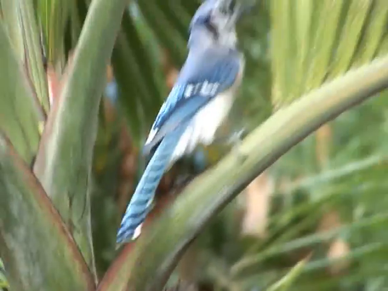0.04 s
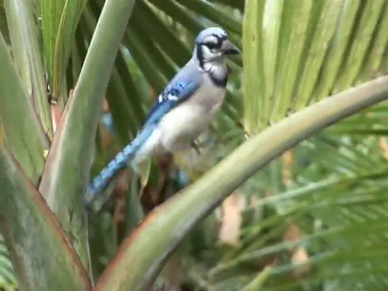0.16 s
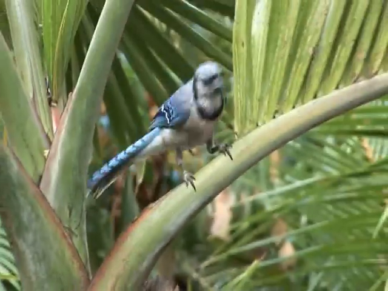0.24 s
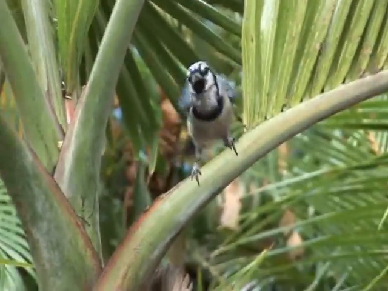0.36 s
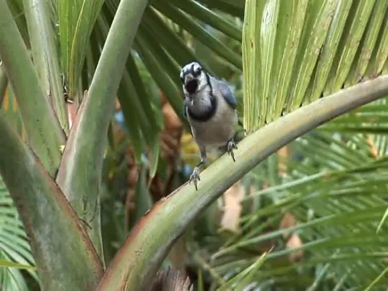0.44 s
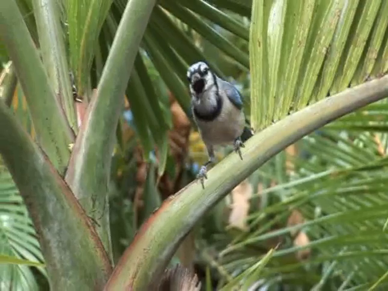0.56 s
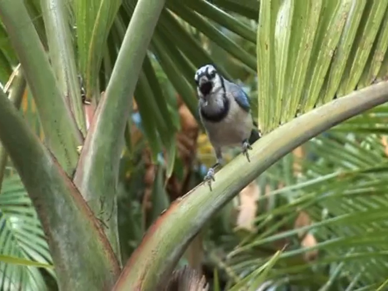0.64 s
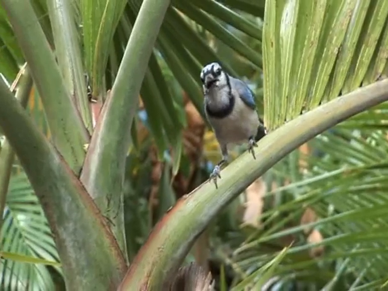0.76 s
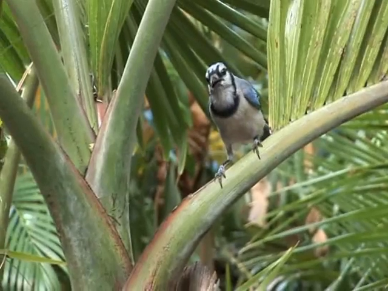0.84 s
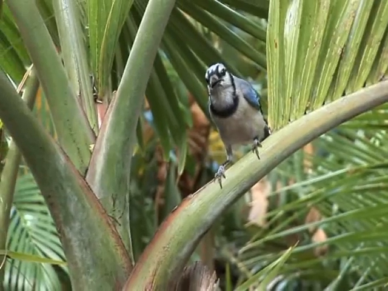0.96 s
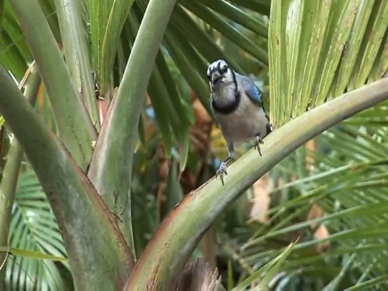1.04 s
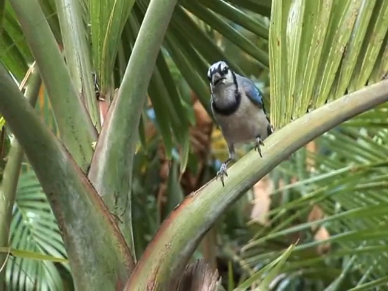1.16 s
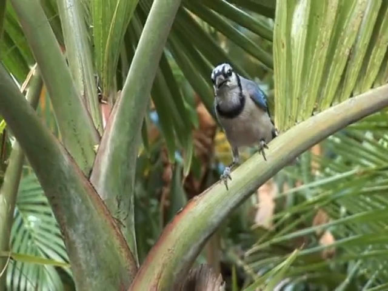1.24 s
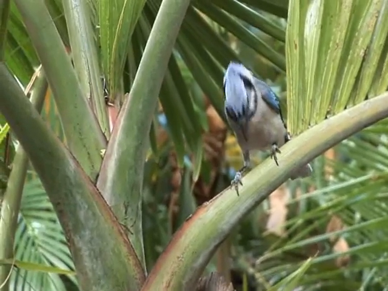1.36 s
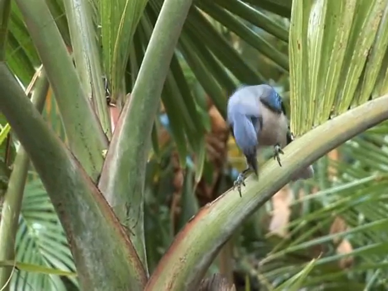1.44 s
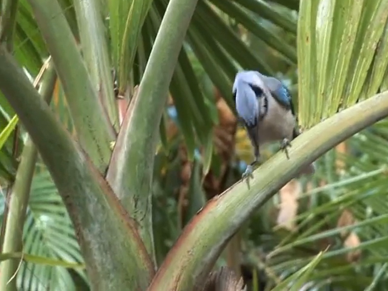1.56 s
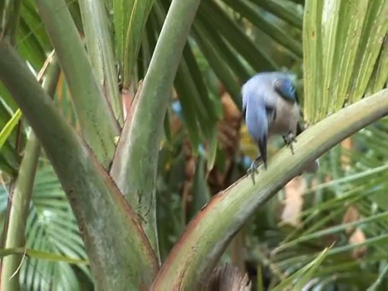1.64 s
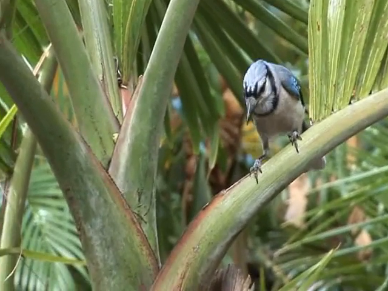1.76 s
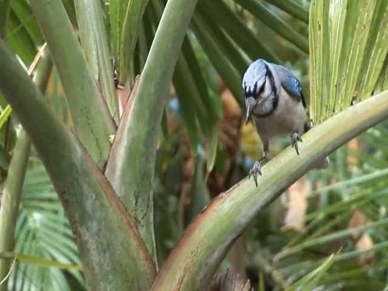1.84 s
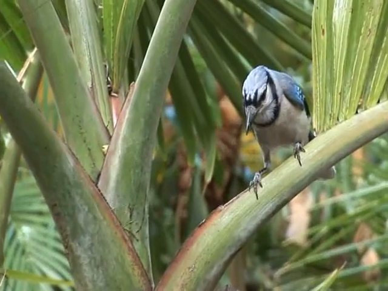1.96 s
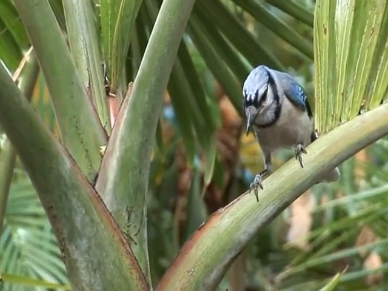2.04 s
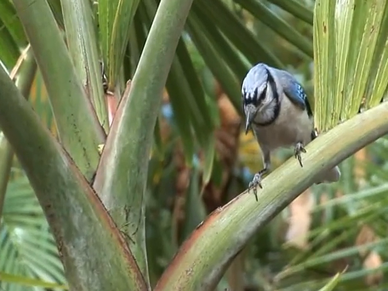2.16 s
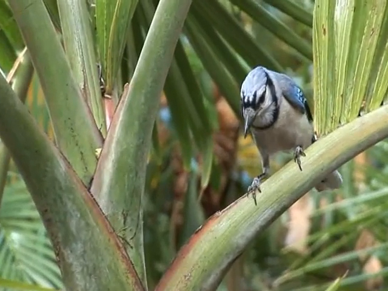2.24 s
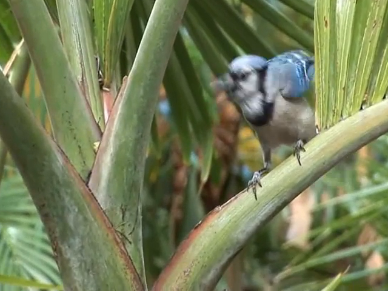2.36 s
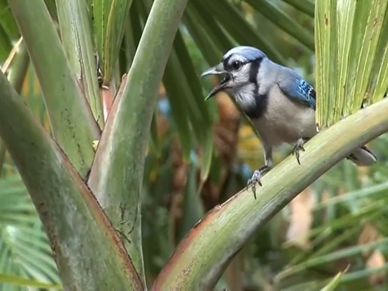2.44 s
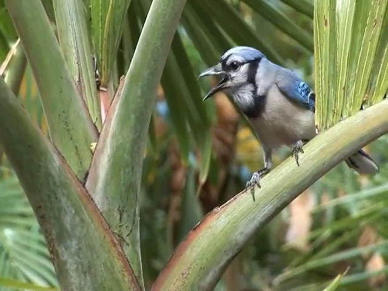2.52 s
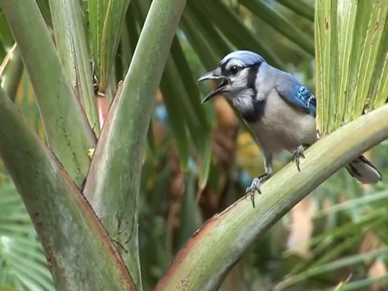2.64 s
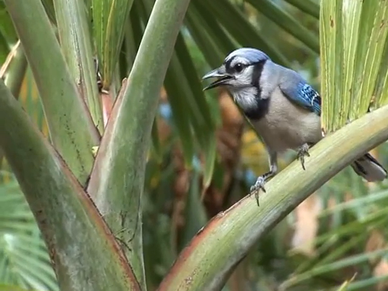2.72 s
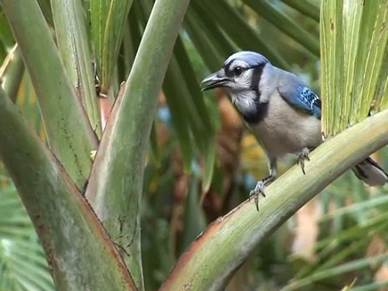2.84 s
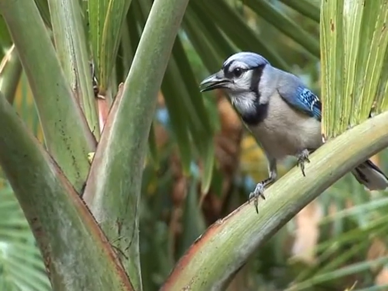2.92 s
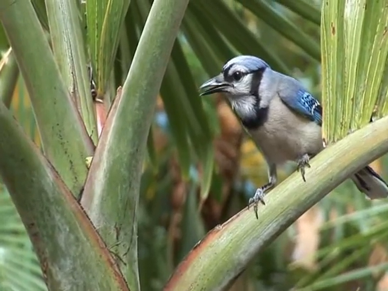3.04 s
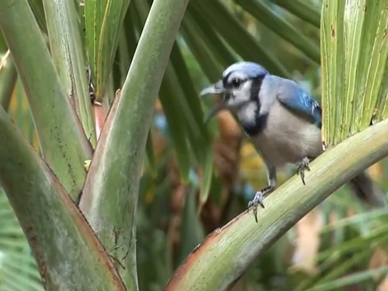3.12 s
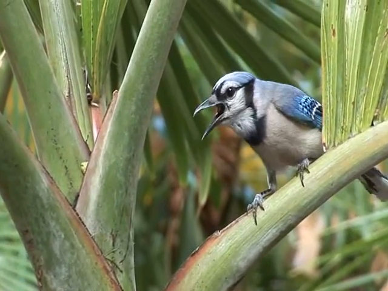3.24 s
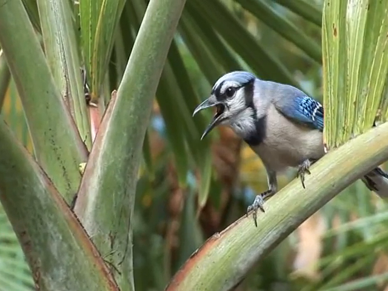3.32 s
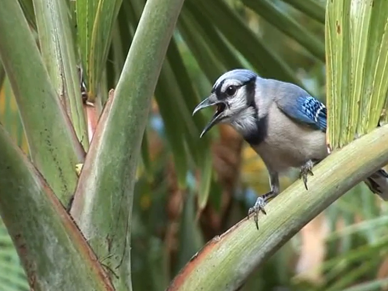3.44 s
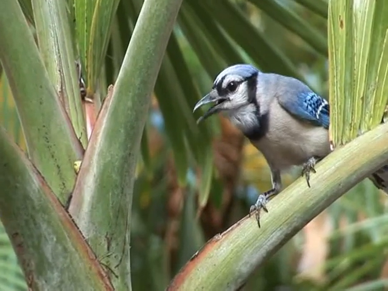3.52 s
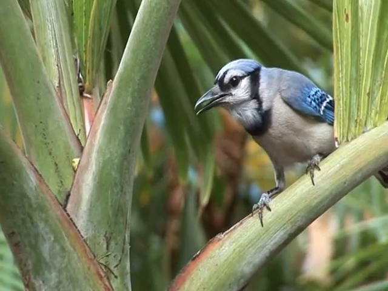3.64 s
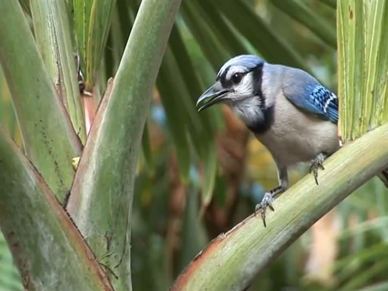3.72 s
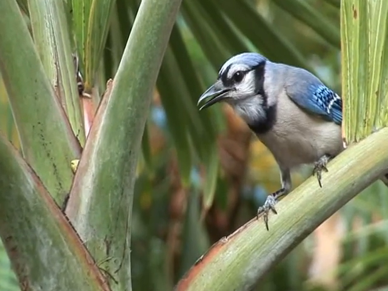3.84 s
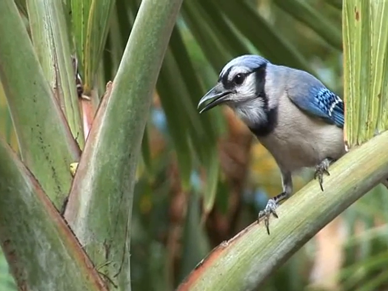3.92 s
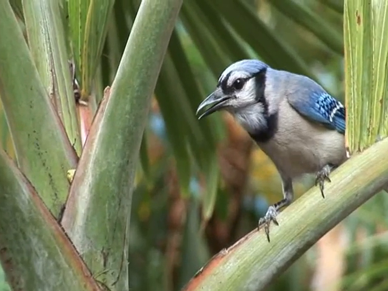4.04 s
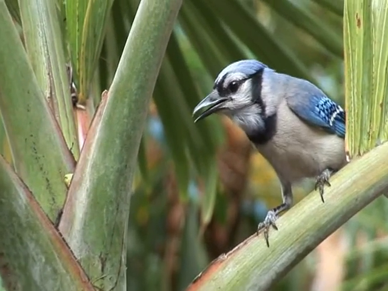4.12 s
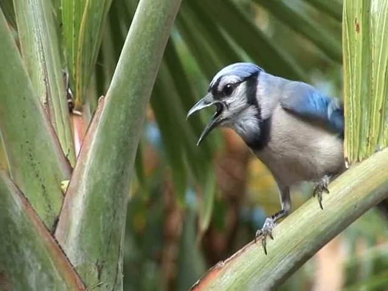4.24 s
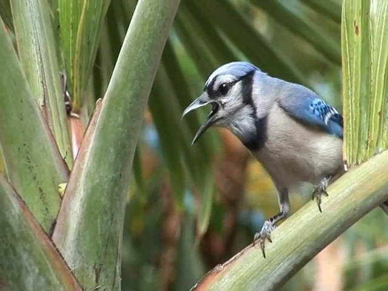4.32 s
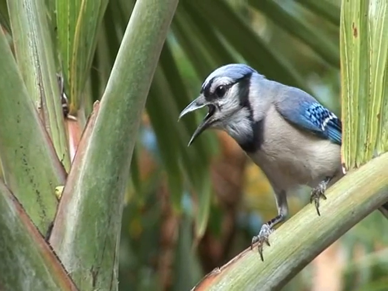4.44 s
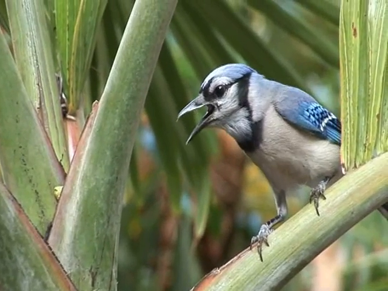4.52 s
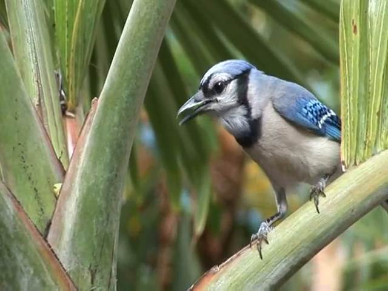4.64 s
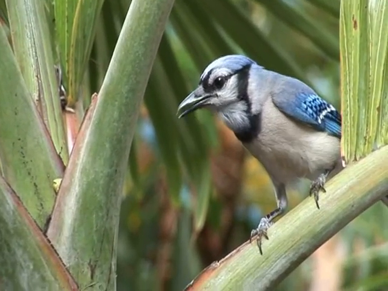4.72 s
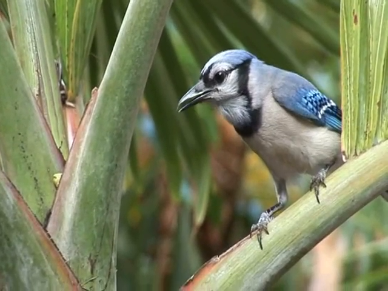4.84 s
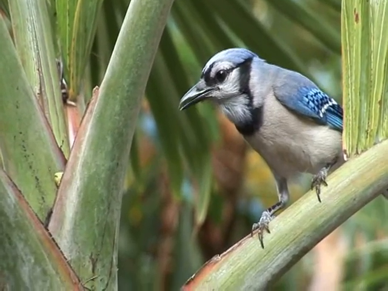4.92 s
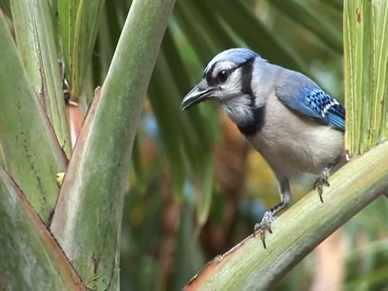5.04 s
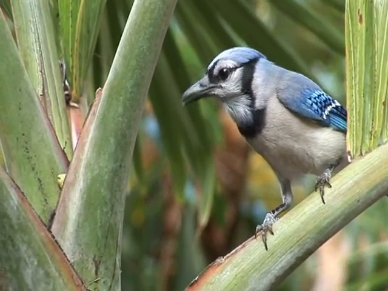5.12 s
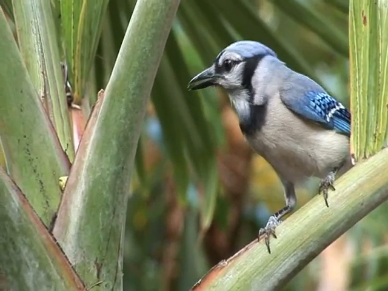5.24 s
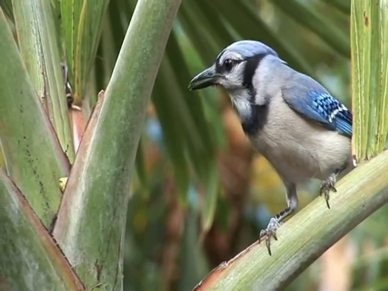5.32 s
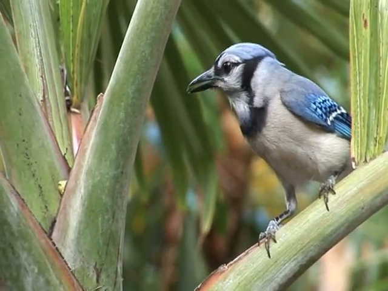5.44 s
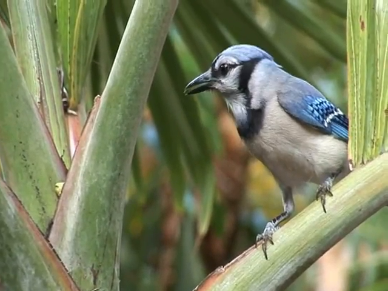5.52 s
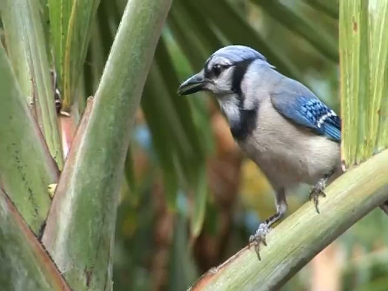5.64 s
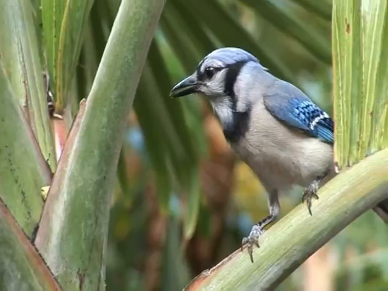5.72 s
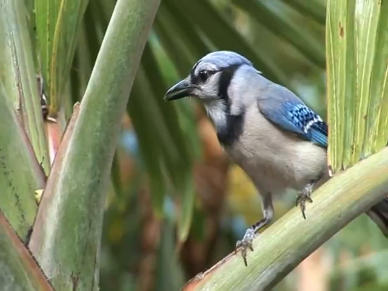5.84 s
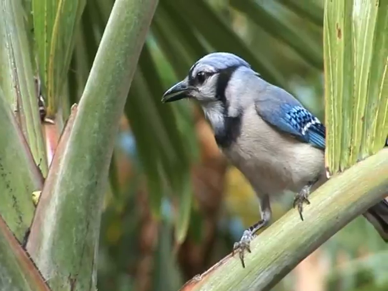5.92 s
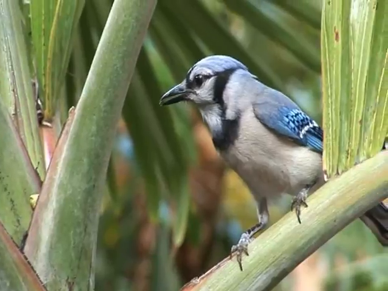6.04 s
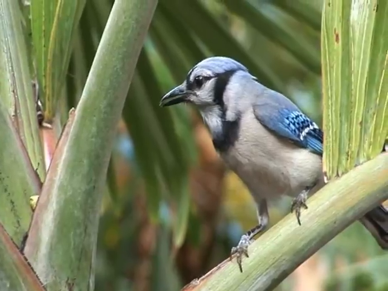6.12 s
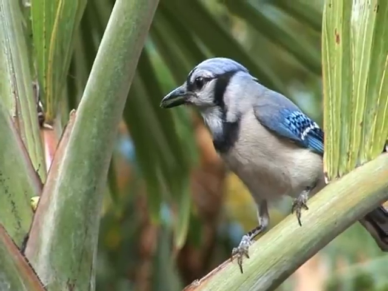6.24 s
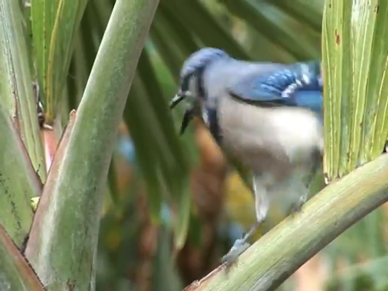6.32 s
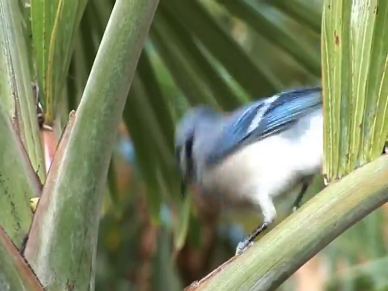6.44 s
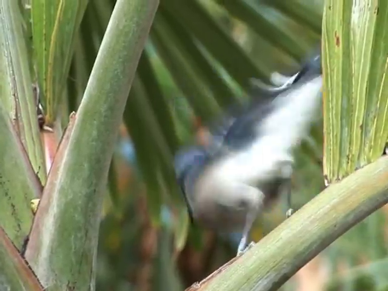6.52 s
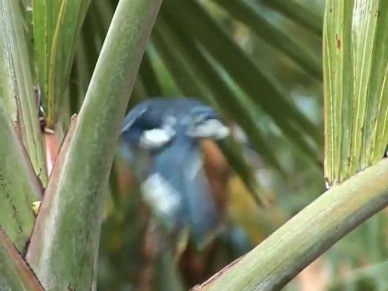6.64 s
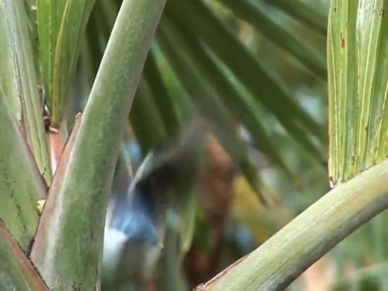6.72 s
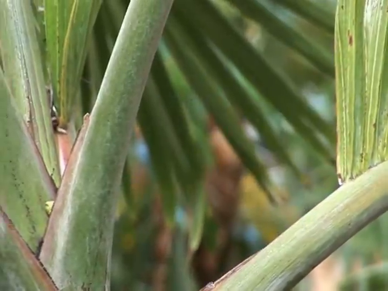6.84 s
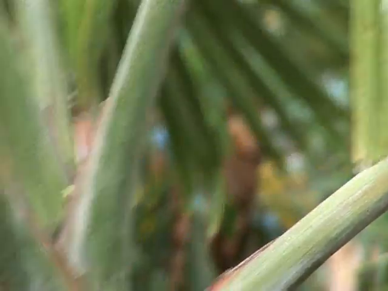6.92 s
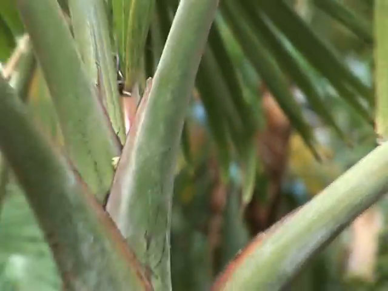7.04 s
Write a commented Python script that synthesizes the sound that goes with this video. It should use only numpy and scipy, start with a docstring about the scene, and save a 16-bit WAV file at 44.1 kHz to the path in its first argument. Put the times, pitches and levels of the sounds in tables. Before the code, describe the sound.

Outdoor garden in stereo, quiet apart from a steady faraway traffic-like rumble with a wavering hum. A nearby jay gives one loud, shrill scolding call, waits, gives three more about a second apart, rests again, then calls once at the end. Every cry starts clear and ends raspy, leaving a short diffuse tail. Two tiny dry ticks in the fronds and soft distant bird notes fill the gaps.

```python
"""A low distant hum in a garden; half a second in, a jay scolds from a palm a few metres from the microphone.
Each of its five calls is a membrane tone that glides up, doubles, then redoubles its period, which adds
half and quarter lines, and ends in a hoarse hiss of pulsed noise. Noise tails are the answer of leaves and walls.
A second bird, made of smeared sine notes, calls faintly far off; noise bursts tick in the fronds.
Shaped noise and two wavering sines make the rumble, hiss and hum behind. Mid and side ports give stereo."""
import sys
import numpy as np
from scipy import signal
from scipy.fft import rfft, irfft, next_fast_len
from scipy.io import wavfile
from scipy.ndimage import map_coordinates

SR = 44100
rng = np.random.default_rng(int(sys.argv[2]) if len(sys.argv) > 2 else 0)


def how_loud(loudness_db):
    """Turn decibels into a plain amplitude multiplier (0 dB gives 1, 20 dB gives 10)."""
    steps = np.asarray(loudness_db, float) / 20
    return 10 ** steps


def pcm_store(signal):
    """Save signal as 16-bit PCM."""
    levels = np.round(np.clip(np.atleast_2d(signal), -1, 1) * 32767)
    wavfile.write(sys.argv[1], SR, levels.astype(np.int16).T)


N = 311787  # samples

# throat and beak as they shape the lines at 1, 3 and 4 times the membrane rate: f/Hz, relative level/dB
WHOLE_THROAT = [(1250, -52), (1500, -50), (1680, -43), (3750, -39), (4250, -40), (4500, -57.5), (4800, -39),
                (5050, -36.5), (5700, -41.5), (6300, -53.5), (6700, -53.5)]
# the same for the half lines at 1.5, 2.5 and 3.5 times the rate: f/Hz, relative level/dB
HALF_THROAT = [(2000, -44), (2530, -40.5), (3500, -41), (3750, -34.5), (4000, -44.5), (4220, -58),
               (5000, -41.5), (5400, -51.5), (5700, -54.5)]
HOARSE_RISE_S = 0.14  # time from the first roughness to full hoarseness


def unit(x):
    """Scaled to rms 1."""
    return x / np.sqrt(np.mean(np.abs(x) ** 2) + 1e-20)


def along(points, hz):
    """(Hz, value) points read on a log frequency axis."""
    f, v = np.transpose(points)
    return np.interp(np.log(hz + 1), np.log(f + 1), v)


def filtered(x, response):
    """x passed through a response given as a function of frequency."""
    m = next_fast_len(x.shape[-1] + 8192)
    spectrum = rfft(x, m) * response(np.fft.rfftfreq(m, 1 / SR))
    return irfft(spectrum, m)[..., :x.shape[-1]]


def coloured(points, size):
    """Noise of rms 1 with the given spectrum."""
    noise = rng.standard_normal(size)
    return unit(filtered(noise, lambda hz: how_loud(along(points, hz))))


def wobble(rate, size):
    """A smooth random curve through rate random knots a second."""
    knots = rng.standard_normal(int(size * rate / SR) + 4)
    return map_coordinates(knots, [np.arange(size) * rate / SR])


def jay():
    """Five calls, each with its own echo tail; the side port hears mostly treble, a quarter cycle off."""
    # the calls: start t/s, end t/s, turns hoarse t/s, lowest line level/dB over the throat curve,
    # change in the opening note's overtone/dB, quarter lines level/dB and treble lines level/dB over their curves
    calls = [(0.475, 0.858, 0.64, -2, 4.5, -33, -42), (2.479, 2.832, 2.583, -0.5, -2, -44, -45),
             (3.283, 3.651, 3.41, -0.5, 7, -38.5, -42), (4.38, 4.729, 4.56, 0, -2, -39, -43.5),
             (6.455, 6.879, 6.71, -3, -4.5, -39.5, -48.5)]
    # the sung part, one list a call: t/s, strongest line f/Hz at twice the membrane rate, its level/dB,
    # level/dB of the half line at 1.5 times the rate, level/dB of the overtone at 3 times the rate
    sung_parts = [
        [(0.487, 2837, -26.5, -61, -44), (0.501, 3125, -19.5, -47, -48), (0.513, 3291, -15.5, -42, -44),
         (0.573, 3370, -15.5, -45, -39), (0.583, 3355, -16, -49, -38), (0.601, 3309, -15, -40, -42),
         (0.619, 3309, -13, -42, -35), (0.647, 3264, -22.5, -36.5, -49), (0.713, 3174, -14, -42, -42),
         (0.739, 3103, -15.5, -43, -39), (0.745, 3067, -19, -41, -55), (0.771, 2955, -16.5, -46, -45.5),
         (0.795, 2822, -25.5, -49, -42), (0.825, 2825, -27.5, -42, -41)],
        [(2.487, 2967, -27.5, -55, -61), (2.503, 3165, -24.5, -47, -40.5), (2.523, 3310, -20, -43, -45),
         (2.557, 3364, -23, -44, -36.5), (2.571, 3384, -18, -43, -40), (2.585, 3334, -23.5, -40, -35),
         (2.629, 3268, -29.5, -38, -47), (2.661, 3229, -20.5, -37, -38.5), (2.701, 3131, -25, -43, -49),
         (2.719, 3086, -20, -50, -59), (2.727, 3070, -18.5, -49, -44), (2.733, 3030, -21, -55, -62),
         (2.743, 2914, -23.5, -48, -50), (2.765, 2895, -26.5, -51, -47.5)],
        [(3.293, 2922, -29.5, -53, -65), (3.307, 3061, -21, -45, -45.5), (3.325, 3320, -26, -37, -42),
         (3.355, 3360, -23, -40, -33), (3.369, 3389, -17.5, -42, -46), (3.417, 3380, -13.5, -41, -34.5),
         (3.433, 3305, -27.5, -35, -32.5), (3.449, 3364, -24.5, -49, -41), (3.453, 3361, -26, -37, -56),
         (3.457, 3280, -27, -35.5, -36), (3.487, 3254, -17.5, -39, -42), (3.531, 3125, -23, -41, -44),
         (3.545, 3025, -14, -41, -56), (3.57, 2985, -23.5, -44.5, -47)],
        [(4.391, 2987, -26.5, -56, -58), (4.403, 3142, -22.5, -45, -44), (4.417, 3299, -20, -36, -48),
         (4.441, 3355, -27.5, -39, -38.5), (4.519, 3299, -21, -39, -43), (4.551, 3213, -21.5, -35.5, -39),
         (4.571, 3200, -16.5, -40, -54), (4.583, 3193, -17.5, -37, -42), (4.597, 3196, -15.5, -37, -41),
         (4.607, 3098, -26, -42, -63), (4.639, 3040, -13, -41, -42.5), (4.645, 3020, -25.5, -41, -64),
         (4.655, 2880, -25, -43, -45), (4.672, 2908, -27, -45.5, -49)],
        [(6.466, 2870, -27.5, -63, -47), (6.478, 3047, -22, -55, -52.5), (6.504, 3357, -20.5, -49.5, -41),
         (6.532, 3348, -27, -44, -41), (6.556, 3384, -20.5, -60, -44), (6.572, 3377, -24.5, -52, -58),
         (6.606, 3374, -24, -41.5, -37.5), (6.626, 3380, -31, -43, -51.5), (6.638, 3302, -22, -38, -40),
         (6.686, 3204, -26.5, -43, -54), (6.704, 3148, -12, -39, -48), (6.73, 3172, -26.5, -36, -48),
         (6.784, 3070, -17.5, -38.5, -59), (6.822, 2958, -24.5, -47.5, -69)],
    ]
    # treble lost as the beak points away, call by call: loss at 11 kHz/dB
    turned = [0.097, .3, 0.079, 0.85, 2.4]
    # side port against mid port: f/Hz, level/dB
    across = [(800, -12), (1600, -10.5), (2400, -25), (3300, -22), (4000, -8), (5000, -6.5), (6000, 3.5),
              (8000, 1), (10800, -7.5), (12500, -5.5), (15500, -6)]
    # near echoes from the fronds: f/Hz, time to die by 60 dB/s
    fronds = [(1000, 0.49), (3200, 0.31), (5500, 0.41), (10000, 0.19)]
    # far echoes from the garden: f/Hz, time to die by 60 dB/s
    garden = [(500, 0.37), (2000, 0.25), (3200, 0.57), (5000, 0.45), (10000, 0.68)]
    out = np.zeros((2, N + 2 * SR))
    for row, sung, turned_db in zip(calls, sung_parts, turned):
        voice = call(row, sung, flutter_db=1.43, shimmer_db=0.88)
        voice = filtered(voice, lambda hz: how_loud(-turned_db * np.log2(1 + (hz / 11000) ** 4)))
        # echo levels: mid, then side
        near = how_loud([[-10.5], [-4]]) * echoes(voice, fronds, wait_s=0.004)
        far = how_loud([[-23], [-13]]) * echoes(voice, garden, wait_s=0.023)
        heard = near + far
        heard[:, :voice.shape[1]] += voice
        out[:, round(row[0] * SR):][:, :heard.shape[1]] += heard
    side = filtered(out[1, :N], lambda hz: how_loud(along(across, hz)) * np.exp(1j * 1.49))
    return np.array([out[0, :N], side])


def call(row, sung, flutter_db, shimmer_db):
    """One call for the mid and side ports: lines at quarters of the membrane rate, and pulsed hiss."""
    # throat and beak as they shape the quarter lines: f/Hz, relative level/dB
    quarter_throat = [(1200, -46), (2100, -21.5), (3000, 1), (3800, -3), (4600, -24.5), (6000, -26),
                      (9000, -19.5), (15500, -26)]
    # the same for the treble lines above 4 times the rate: f/Hz, relative level/dB
    treble_throat = [(5500, -4), (6500, -11.5), (7500, -10.5), (8500, -11.5), (10000, -9), (11200, -17),
                     (12500, -9), (14000, -13), (15500, -25.5)]
    # the same for the hiss: f/Hz, relative level/dB
    hiss_throat = [(590, -78), (1000, -29.5), (1230, -39), (1400, -18.5), (1890, -30), (2890, -3),
                   (3250, -8), (3910, -5.5), (4440, -15.5), (5650, -25), (8090, -32.5), (13300, -24.5),
                   (15800, -53)]
    rattle_hz, rattle_depth = 114.8, 0.49  # mean rate of a slow second vibration; depth when fully hoarse
    t, hz, two, low, upper, half, quarter, treble, unsteady, hiss = controls(*row, sung)
    n = len(t)
    phase = 2 * np.pi * np.cumsum(hz) / SR
    slip = unsteady * (1.73 * wobble(120, n) + 0.99 * wobble(400, n))
    shimmer = shimmer_db * wobble(550, n)  # cycles differ in size: fuzz beside every line
    # a faint low line that rises as the pitch falls
    tone = how_loud(two - 43) * np.cos(2 * np.pi * 3050 * t - 3 * phase / 2)
    for q in range(4, 48):  # q counts quarters of the membrane rate
        f = q * hz / 4
        if q % 2:  # the period redoubled: the pattern repeats every fourth cycle
            db = quarter + along(quarter_throat, f) + 2.5 * wobble(39, n)
        elif q > 16:
            db = treble + along(treble_throat, f)
        elif q % 4:  # the period doubled: half lines from strong and weak cycles in turn
            db = (upper if q == 14 else half) + along(HALF_THROAT, f)
        elif q == 8:  # strongest line
            db = two
        else:
            db = (low if q == 4 else upper) + along(WHOLE_THROAT, f)
        flutter = flutter_db * (min(q, 22) / 8) ** 0.9 * wobble(49.6, n)
        roughness = 7 * unsteady * min(q, 14) / 12 * wobble(244.3, n)
        db = db + flutter + shimmer + roughness
        # cycles come early or late, which smears high lines most
        turn = q / 4 * (phase + slip * (q / 12) ** 1.3) + rng.uniform(0, 2 * np.pi)
        tone += np.sqrt(2) * how_loud(db) * (f < 16000) * np.cos(turn)
    # the second vibration splits the lines as the voice turns hoarse
    split = rattle_depth * np.clip((t - row[2]) / HOARSE_RISE_S, 0, 1)
    rattle_rate = rattle_hz * (1 + 0.1512 * wobble(25.14, n))
    tone *= 1 + split * np.cos(2 * np.pi * np.cumsum(rattle_rate) / SR)
    puffs = 1 + np.cos(phase / 2)  # one puff of air for every two membrane cycles
    breath = []
    for _ in range(2):  # separate noise for mid and side
        air_noise = puffs * rng.standard_normal(n)
        shaped = filtered(air_noise, lambda f: how_loud(along(hiss_throat, f)))
        breath.append(how_loud(hiss) * unit(shaped))
    edges = np.clip(np.minimum((t - t[0]) / 0.0025, (t[-1] - t) / 0.035), 0, 1)
    return edges * (tone + np.array(breath))


def controls(start, end, hoarse_s, low_db, open_db, quarter_db, treble_db, sung):
    """Membrane rate, line levels, unsteadiness of the cycles and hiss level through one call."""
    # a short flat note of even cycles opens the call: membrane rate, length, strongest, 1.5 and 3 times lines
    open_hz, open_s, open_main_db, open_half_db, open_third_db = 1267.4, 0.006, -33.5, -66, -38.5
    # after the sung part the membrane rate sags, the voice fades and the weaker lines rise a little
    sag_hz_per_s, main_fade_db, weak_rise_db, treble_fade_db = 1300, 23.5, 2, 8.5
    scoop_s = 0.071  # length of the unsettled rise
    steady, scooping, rough = 0.02, 0.08, 0.19  # relative unsteadiness: clear, rising, hoarse
    hiss_db, hiss_scoop_db, hiss_hoarse_db = -54.5, 8.5, 26  # clear voice, then what rise and hoarseness add
    # the four-cycle pattern swells at the top of the arch
    swell_at_s, swell_wide_s, swell_db, quarter_hoarse_db = 0.092, 0.044, 15.5, 7.5
    t = np.arange(start, end, 1 / SR)
    s, line_hz, line_db, half_db, third_db = np.transpose(sung)
    age, late = t - start, np.clip(t - s[-1], 0, None)
    fade = late / late[-1]

    def read(opening, column):
        """The opening value held, then a path through the sung points."""
        return np.interp(t, np.r_[start, start + open_s, s], np.r_[opening, opening, column])

    hz = read(open_hz, line_hz / 2) - sag_hz_per_s * late
    main = read(open_main_db, line_db) - main_fade_db * fade
    hoarse = np.clip((t - hoarse_s) / HOARSE_RISE_S, 0, 1)
    scoop = np.clip(2 - 2 * age / scoop_s, 0, 1)
    weak_rise = weak_rise_db * fade
    low = low_db + weak_rise
    # levels over the throat curve, which call() adds back
    upper = read(open_third_db + open_db, third_db) - along(WHOLE_THROAT, 3 * hz) + weak_rise
    half = read(open_half_db, half_db) - along(HALF_THROAT, 3 * hz / 2) + weak_rise
    swell = np.exp(-((age - swell_at_s) / swell_wide_s) ** 2 / 2)
    quarter = quarter_db - swell_db * (1 - swell) + quarter_hoarse_db * hoarse + weak_rise
    treble = treble_db - treble_fade_db * fade
    unsteady = steady + (scooping - steady) * scoop + (rough - steady) * hoarse
    hiss = hiss_db + hiss_scoop_db * scoop + hiss_hoarse_db * hoarse ** 1.6
    return t, hz, main, low, upper, half, quarter, treble, unsteady, hiss


def echoes(x, decay, wait_s):
    """Many reflections as a noise tail in which each frequency dies at its own speed."""
    hz, t, z = signal.stft(rng.standard_normal((2, SR * 3 // 4)), SR, nperseg=256)
    fall = how_loud(-60 * t / along(decay, hz)[:, None])
    tail = signal.istft(z * fall, SR, nperseg=256)[1]
    wait = round(wait_s * SR)
    delayed = np.pad(x, ((0, 0), (wait, SR // 10 - wait)))
    return signal.fftconvolve(delayed, tail / np.linalg.norm(tail[0]), axes=1)


def ticks():
    """Dry ticks in the fronds: short bright snaps of twice-differenced noise dying 60 dB in 30 ms."""
    # t/s, approximate peak level/dB
    snaps = [(1.7714, -51), (3.8476, -49.5)]
    out, t = np.zeros((2, N)), np.arange(SR // 25) / SR
    for s, db in snaps:
        bright = np.diff(rng.standard_normal((2, len(t) + 2)), 2)
        out[:, round(s * SR):][:, :len(t)] += bright * how_loud(db - 10.5 - 60 * t / 0.03)
    return out


def far_bird():
    """Distant sine notes smeared by their echoes into fuzzy lines, 12 dB weaker in the side port."""
    # peak t/s, f/Hz, rms level at the peak/dB, time to rise 20 dB/s, time to fall 20 dB/s
    notes = [(5.66, 3050, -63, .06, .08), (5.831, 3080, -61, .1, .15), (6.15, 3140, -60, .1, 0.13),
             (6.33, 2950, -59, .06, 0.1), (6.34, 2730, -67, .06, .1)]
    t = np.arange(N) / SR
    smear = unit(wobble(250, N) + 1j * wobble(280, N))  # shared by all notes
    line = np.zeros(N)
    for s, hz, db, rise, fall in notes:
        level = how_loud(db - 20 * np.maximum((s - t) / rise, (t - s) / fall))
        line += level * np.real(smear * np.exp(2j * np.pi * hz * t))
    return np.sqrt(2) * line * how_loud([[0], [-12]])


def air():
    """Far traffic-like rumble and hiss, unrelated in the two ports, with wavering hum lines in the middle."""
    # spectrum at the mid port: f/Hz, relative level per Hz/dB
    air_mid = [(18, -36), (30, -6), (49, -1.5), (90, -5), (127, -7), (209, -12), (286, -9.5), (326, -17),
               (581, -20.5), (680, -23), (2390, -25.5), (3110, -24.5), (6650, -47.5), (14600, -43.5),
               (15800, -76)]
    # spectrum at the side port: f/Hz, relative level per Hz/dB
    air_side = [(12, -67.5), (20, -24), (90, -14), (110, -14.5), (284, -6.5), (408, -9), (586, -6),
                (916, -11), (3310, -22.5), (5950, -19), (7230, -28), (14500, -34), (15800, -45)]
    # distant hum: f/Hz, rms level/dB
    hum = [(43.1, -57), (118.4, -58)]
    mid_db, side_db = -49, -58.5  # rms of the noise, before its slow wavering
    t = np.arange(N) / SR
    mid = how_loud(mid_db + 0.19 * wobble(0.22, N)) * coloured(air_mid, N)
    for hz, db in hum:
        level = np.sqrt(2) * how_loud(db + 1.3 * wobble(3.09, N))
        mid += level * np.sin(2 * np.pi * hz * t + 1.87 * wobble(7.1, N))
    side = how_loud(side_db + 0.56 * wobble(0.59, N)) * coloured(air_side, N)
    return np.array([mid, side])


def scene():
    """Mid and side ports, turned into left and right."""
    mid, side = jay() + ticks() + far_bird() + air()
    return np.array([mid + side, mid - side])


def roll_off(x):
    """The treble ends steeply here."""
    return signal.sosfilt(signal.butter(12, 16500, fs=SR, output="sos"), x)


def record(dry):
    """The camera drops the deepest bass, below about 30 Hz, and the treble from 15850 Hz up."""
    band = filtered(dry, lambda hz: (hz < 15850) / np.sqrt(1 + (30 / (hz + 1)) ** 8))
    return roll_off(band)


dry = scene()
out = record(dry)
pcm_store(out)
```